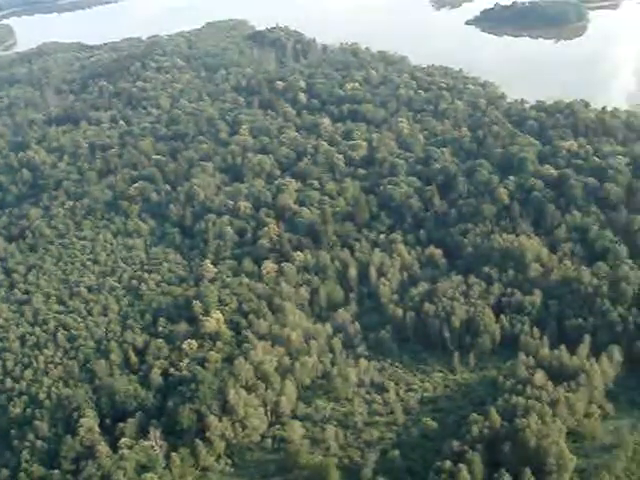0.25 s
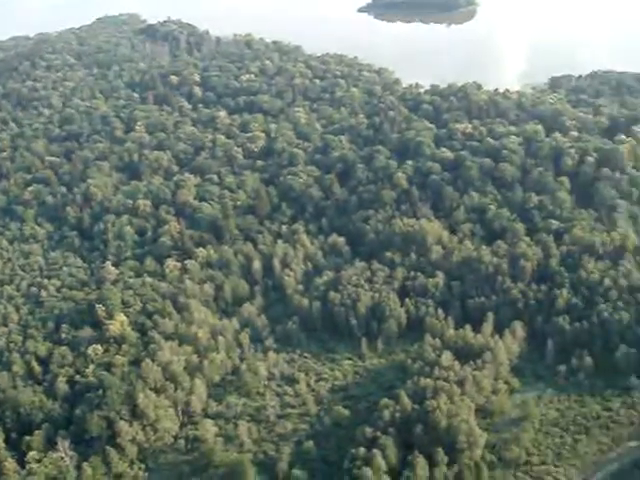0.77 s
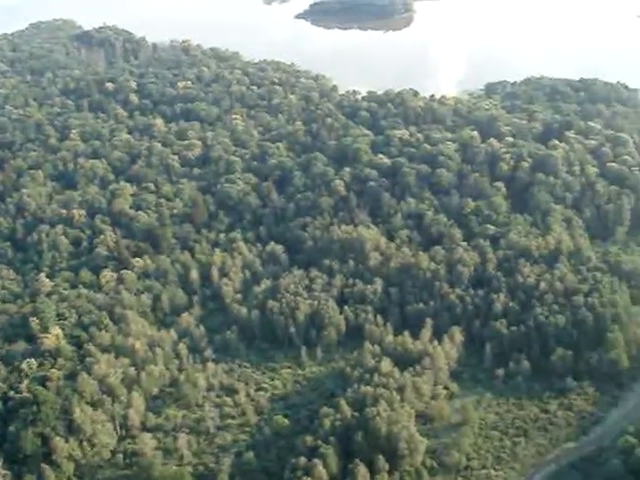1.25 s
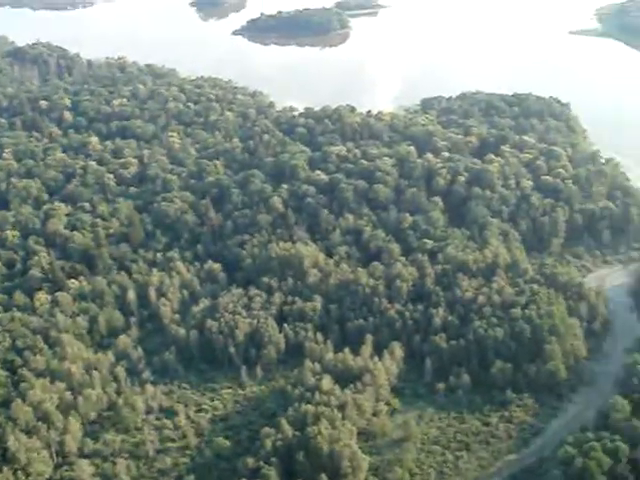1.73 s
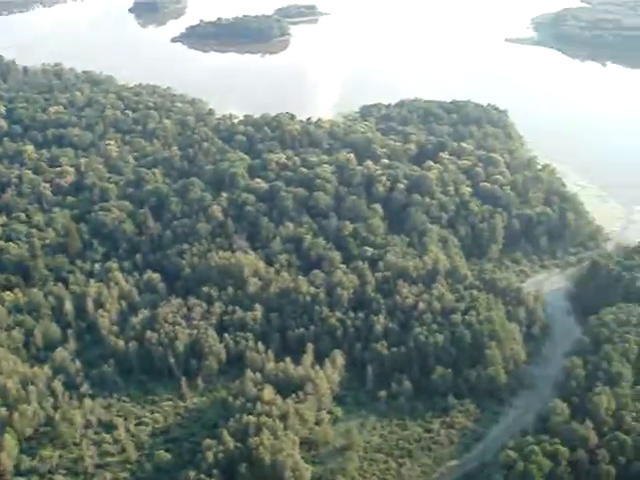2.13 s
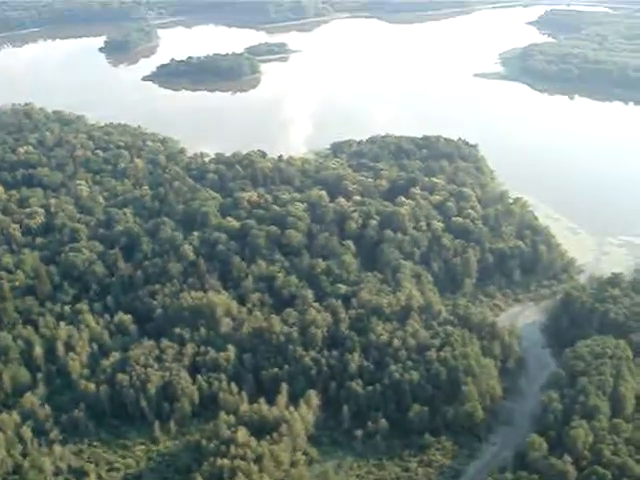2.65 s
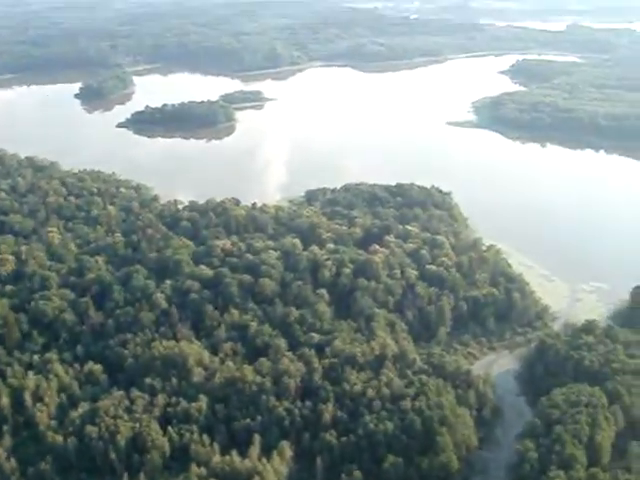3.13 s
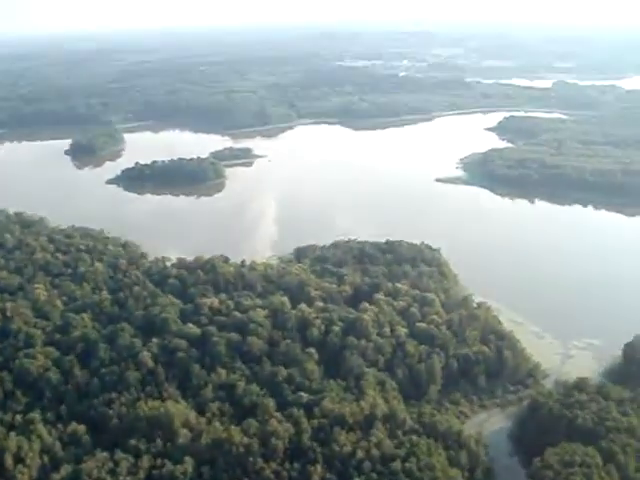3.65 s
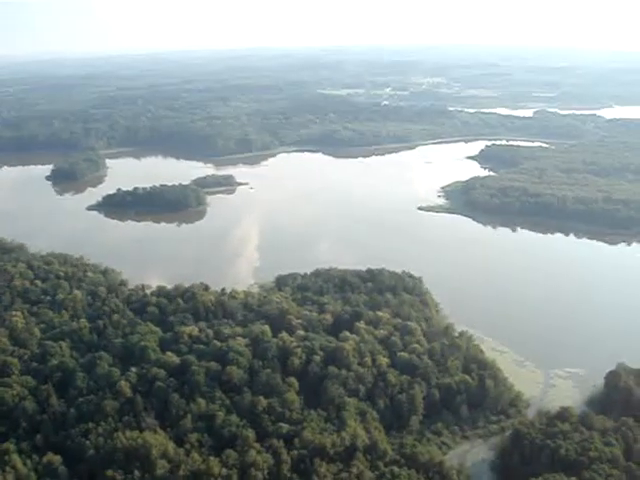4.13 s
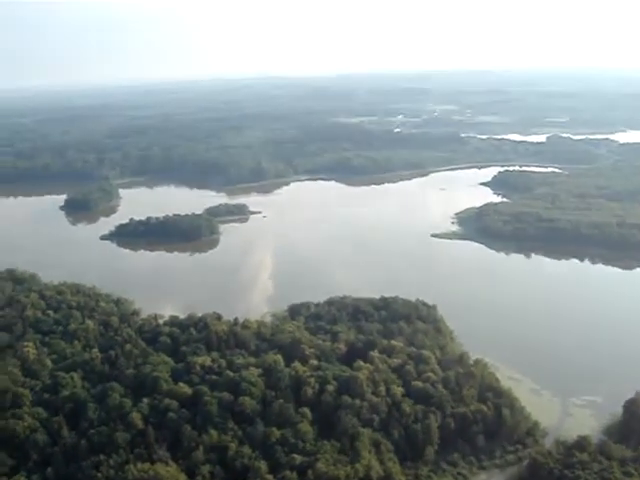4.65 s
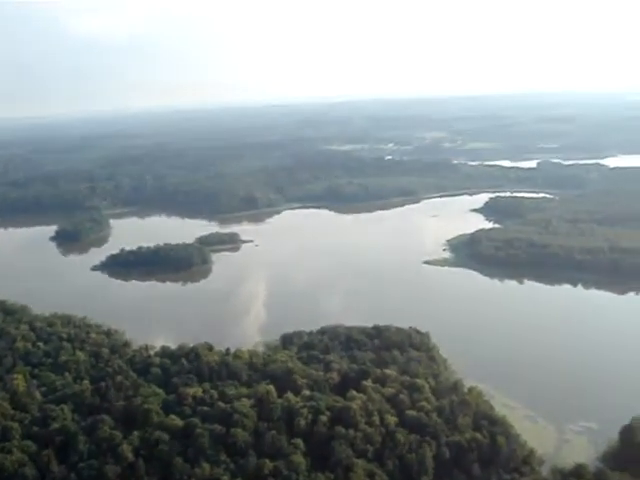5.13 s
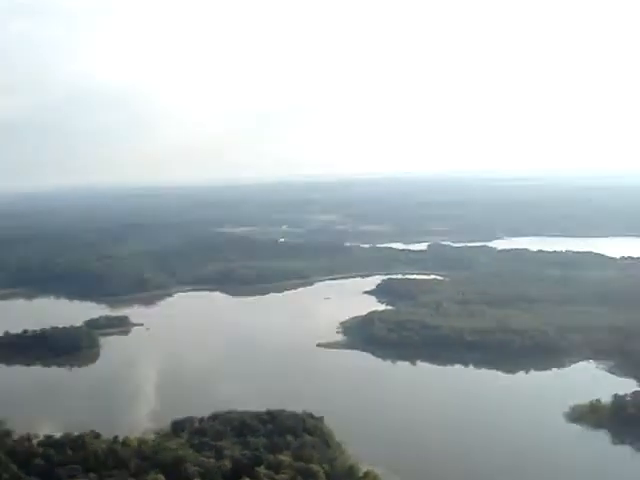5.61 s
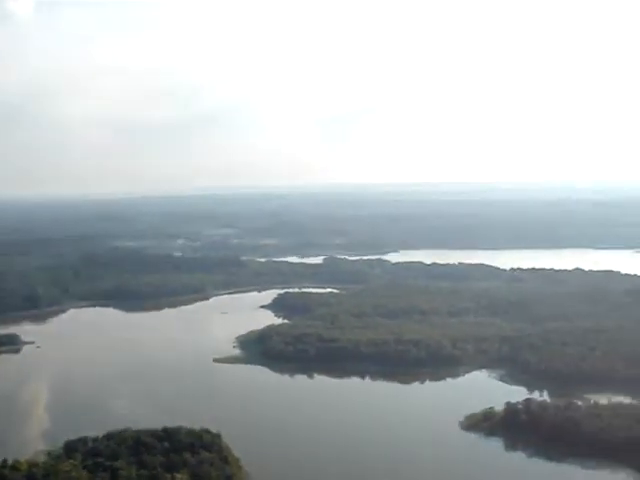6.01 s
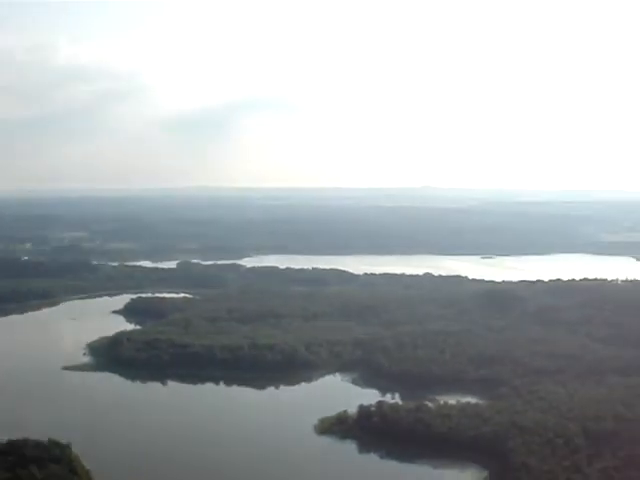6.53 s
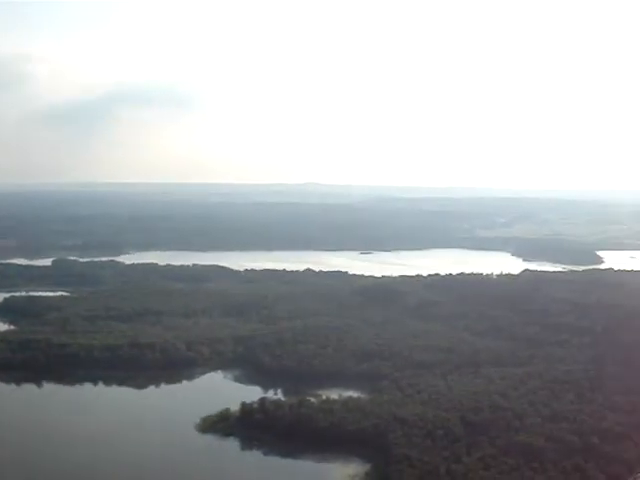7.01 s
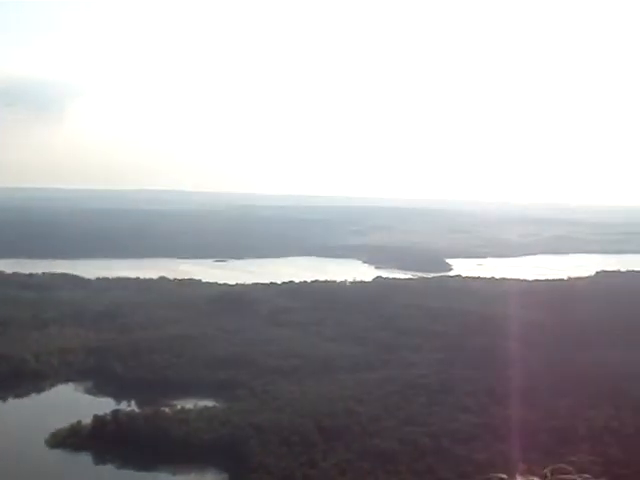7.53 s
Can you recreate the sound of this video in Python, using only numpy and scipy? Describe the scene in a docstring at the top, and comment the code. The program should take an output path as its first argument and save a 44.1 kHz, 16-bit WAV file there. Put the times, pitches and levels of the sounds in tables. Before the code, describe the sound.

Quiet, uneven gas spurts and tiny low flame puffs come first, with a faint metallic ring. Then the propane valve opens: a sharp rush, a deep soft-edged thump, and a massive continuous flame roar. It flares, settles quickly and holds almost even, slowly changing tone as the microphone swings around. Heard very near, centred, dry, outdoors without echo, with no pause before the end.

```python
"""Short hisses of gas spit over a fluttering pilot flame, then a whoomp opens one long, roaring blast.
This is a hot-air balloon's propane burner, heard from the basket in open air.
Flame, jet, whoomp and spurts are shaped noise; pilot puffs and a fading hum of the metal are sines.
The microphone turns slowly, so reflections reshape the roar and the jet's hiss is gradually shaded."""
import sys
import numpy as np
from scipy import signal
from scipy.fft import rfft, irfft, next_fast_len
from scipy.io import wavfile
from scipy.ndimage import uniform_filter1d, map_coordinates

SR = 44100
rng = np.random.default_rng(int(sys.argv[2]) if len(sys.argv) > 2 else 0)


def to_wav(sig):
    """Store sig (one row per channel, or 1-D mono) as 16-bit WAV at the path in sys.argv[1].

    Samples outside -1..1 are clipped; the rate is SR.
    """
    pcm = np.clip(np.atleast_2d(sig), -1, 1) * 32767
    pcm = np.round(pcm).astype(np.int16)
    wavfile.write(sys.argv[1], SR, pcm.T)  # frames by channels


N = 342216

# Noise colours, each rescaled to rms 1 before its layer's level: freq_hz, density_db (relative, per Hz)
ROAR_SPECTRUM = [(15, -44), (28, -35), (60, -20), (105, -15), (148, -5.5), (195, -7.5), (255, -1.5),
                 (315, -4.5), (355, 2), (395, -2.5), (470, 2), (550, 2), (750, -2.5), (950, -13),
                 (1400, -35.5)]
RASP_SPECTRUM = [(600, -22.5), (900, -1.5), (1100, 2.5), (1400, -1.5), (1650, -0.5), (1780, 2.5), (1920, 3),
                 (2090, -1), (2350, -4.5), (2600, -16.5), (3400, -29)]
HISS_SPECTRUM = [(1500, -23.5), (2500, -8.5), (3100, -6.5), (4100, -3), (4750, -4.5), (5200, -1.5),
                 (6250, 0), (6800, -1.5), (7650, -2.5), (8300, -11), (9900, -17.5), (11000, -54.5)]
THUMP_SPECTRUM = [(25, -34), (70, -14), (105, -3.5), (145, 2), (280, -11), (420, -8), (700, -11),
                  (900, -22), (1150, -18.5), (2200, -25.5), (3000, -27), (8000, -53)]
SPIT_SPECTRUM = [(300, -11), (1000, -19), (2000, -14.5), (2800, -11.5), (4100, -2), (4900, -5), (5800, 2),
                 (7700, -1), (8500, -10), (10000, -22.5)]
PILOT_SPECTRUM = [(25, -11.5), (70, -2.5), (145, 5.5), (250, 6), (400, 4.5), (700, 3.5), (900, -11.5),
                  (1100, 2), (1420, -5), (1900, -0.5), (3000, -5.5), (4300, -2), (5500, -13), (9900, -29)]
# Short spurts of gas before the blast: start_s, level_db, hold_s (counted from the start)
SPURTS = [(.006, -30, 0.034), (0.073, -32.5, 0.019), (0.19, -25.5, 0.016), (0.326, -28.5, .016),
          (.363, -32.5, 0.015), (0.44, -42, 0.011), (0.499, -26, 0.017), (0.591, -41, .012),
          (0.648, -32.5, 0.015), (.663, -29.5, 0.012), (.711, -31.5, .009), (.759, -38, .011),
          (0.837, -24, .009)]
# Burner metal stirred by the spurts: freq_hz, level_db (when stirred hardest), width_hz
METAL_RING = [(1060, -54, 90), (1890, -46, 200), (2240, -52.5, 21), (3300, -60, 700), (4300, -44.5, 400),
              (5450, -44.5, 240)]
# Soft low puffs of the small flame: start_s, level_db, pitch_hz
PUFFS = [(.06, -27.5, 170), (0.124, -28, 185), (0.249, -31.5, 440), (.393, -33, 534), (.465, -36, 175),
         (0.6, -32, 163), (0.834, -24.5, 188)]
# Where reflections cancel the direct sound (a negative depth is a slight boost):
# freq_before_hz, freq_after_hz, width (natural log of frequency ratio), depth_before_db, depth_after_db
NOTCHES = [(440, 400, 0.063, 4, 0), (864, 593, 0.12, 7, 6.5), (1670, 956, 0.25, 3.5, 3),
           (2190, 2144, 0.056, -0.5, 4.5), (2570, 3480, 0.091, 3, 1.5)]
# Change of colour when fully shaded: freq_hz, gain_db
SHADE_COLOUR = [(150, 0), (290, -1.5), (440, .5), (540, -0.5), (760, 4), (950, 1.5), (2200, -1.5),
                (2750, 1.5), (4300, -2), (5700, -4.5), (7000, -3), (10000, -4)]

# The main flame flares up as it lights, then burns evenly
LIGHT_S, LIGHT_RISE_S, FLARE_SETTLE_S = 0.92, 0.068, 0.17
ROAR_DB, ROAR_FLARE_DB = -16, 3.5
RASP_DB, RASP_FLARE_DB = -23.8, 5
# The flame gains a little as the microphone comes to face it
FACING_START_S, FACING_LENGTH_S, FACING_ROAR_DB, FACING_RASP_DB = 3.7, 2.3, 0.5, 2.8
# The gas jet opens with a surge, then settles to a steady flow
VALVE_OPEN_S, JET_RISE_S, JET_RISE_DB = 0.904, 0.054, 29
JET_DB, SURGE_DB, SURGE_HOLD_S, SURGE_SETTLE_S = -23.5, 7.5, 0.053, 0.042
WHISTLE_S, WHISTLE_SPREAD_S, WHISTLE_DB = 3.75, 0.73, -32.5
# The cloud of gas catches fire
IGNITION_S, WHOOMP_RISE_S, WHOOMP_HOLD_S, WHOOMP_T60_S, WHOOMP_DB = 0.914, 0.019, 0.017, 0.11, -8.5
SPURT_RISE_S, SPURT_T60_S, RING_T60_S = 0.0053, 0.13, 0.57
# The microphone swings round, then the jet falls into shade
SWING_START_S, SWING_LENGTH_S = 1.95, 4.1
SHADE_START_S, SHADE_LENGTH_S = 4.78, 2.6
TOP_HZ = 10080
FRAME = 2048  # samples per spectral frame, half overlapped


def flame():
    """Large eddies roar; small ones rasp, in quick flickers as pockets of gas burn."""
    t = clock()
    flare = settling(t, LIGHT_S + LIGHT_RISE_S, FLARE_SETTLE_S)
    facing = eased(t, FACING_START_S, FACING_LENGTH_S)
    roar_db = ROAR_DB + ROAR_FLARE_DB * flare + FACING_ROAR_DB * facing
    rasp_db = RASP_DB + RASP_FLARE_DB * flare + FACING_RASP_DB * facing
    flicker = wobble(160)  # shared, so roar and rasp flicker together
    roar = amp(roar_db + 0.5 * flicker + 0.26 * wobble(8.1)) * rush(ROAR_SPECTRUM)
    rasp = amp(rasp_db + 0.51 * flicker + 0.52 * wobble(12)) * rush(RASP_SPECTRUM)
    return ramp(t, LIGHT_S, LIGHT_RISE_S) * (roar + rasp)


def jet():
    """Gas surges from the nozzles, settles to an even hiss and whistles faintly for a moment."""
    t = clock()
    opening = ramp(t, VALVE_OPEN_S, JET_RISE_S)
    surge = settling(t, VALVE_OPEN_S + JET_RISE_S + SURGE_HOLD_S, SURGE_SETTLE_S)
    level_db = JET_DB + SURGE_DB * surge - JET_RISE_DB * (1 - opening)
    hiss = amp(level_db + 0.8 * wobble(220) + 0.49 * wobble(15)) * rush(HISS_SPECTRUM)
    swell = np.exp(-((t - WHISTLE_S) / WHISTLE_SPREAD_S) ** 2)
    whistle = amp(WHISTLE_DB) * swell * singing(6190, width_hz=260)
    return (hiss + whistle) * (t > VALVE_OPEN_S)


def ignition():
    """The gathered gas burns all at once in a low whoomp."""
    t = clock()
    age = np.maximum(t - IGNITION_S - WHOOMP_RISE_S - WHOOMP_HOLD_S, 0)
    decay = amp(WHOOMP_DB - 60 * age / WHOOMP_T60_S)
    return eased(t, IGNITION_S, WHOOMP_RISE_S) * decay * rush(THUMP_SPECTRUM)


def spurt_power(t60_s):
    """Summed power of all the spurts, each dying away over t60_s."""
    t = clock()
    return sum((amp(level_db) * burst(t, start_s, SPURT_RISE_S, hold_s, t60_s)) ** 2
               for start_s, level_db, hold_s in SPURTS)


def spurts():
    """Each spurt of gas opens fast, holds briefly and bleeds away; the metal rings on."""
    sputter = amp(1.9 * wobble(500) + 0.6 * wobble(90))
    spit = rippled(rush(SPIT_SPECTRUM), patchy_db=4.0, frames=6)
    hiss = np.sqrt(spurt_power(SPURT_T60_S)) * sputter * spit
    ring_power = spurt_power(RING_T60_S)
    ring = sum(amp(level_db) * singing(freq_hz, width_hz) for freq_hz, level_db, width_hz in METAL_RING)
    return hiss + np.sqrt(ring_power / ring_power.max()) * ring


def pilot():
    """The small flame flutters as soft noise and puffs in short, low sine swells."""
    t = clock()
    out = amp(-42.0 + 1.5 * wobble(15)) * rush(PILOT_SPECTRUM)
    for start_s, level_db, pitch_hz in PUFFS:
        age = np.maximum(t - start_s, 0)
        swell = age / 0.0023  # the puff peaks 2.3 ms after it starts
        out += amp(level_db) * swell * np.exp(1 - swell) * np.sin(2 * np.pi * pitch_hz * age)
    return out


def metal_hum(freq_hz, level_db, t60_s):
    """One clear mode of the metal hums faintly, wavers and dies away from the start."""
    t = clock()
    level = amp(level_db - 60 * t / t60_s + 2 * wobble(14))
    return level * np.sin(2 * np.pi * freq_hz * t + 0.25 * wobble(27))


def turning(x):
    """As the microphone turns, the notches of near reflections slide and the treble falls into shade."""
    hz, t, frames = signal.stft(x, SR, nperseg=FRAME)
    swing = eased(t, SWING_START_S, SWING_LENGTH_S)
    shade = eased(t, SHADE_START_S, SHADE_LENGTH_S)
    gain_db = np.outer(curve_db(SHADE_COLOUR, hz), shade)
    for before_hz, after_hz, width, before_db, after_db in NOTCHES:
        centre_hz = before_hz * (after_hz / before_hz) ** swing
        depth_db = before_db + (after_db - before_db) * swing
        distance = np.log((hz[:, None] + 1) / centre_hz) / width
        gain_db -= depth_db * np.exp(-distance ** 2)
    return signal.istft(frames * amp(gain_db), SR, nperseg=FRAME)[1][:N]


def rippled(x, patchy_db, frames):
    """Random ripples of colour, growing up to 3 kHz, each lasting about the given count of frames."""
    hz, _, z = signal.stft(x, SR, nperseg=FRAME)
    ripple = uniform_filter1d(rng.standard_normal(z.shape), size=9, axis=0)  # smooth over frequency
    ripple = uniform_filter1d(ripple, size=frames, axis=1)  # smooth over time
    gain_db = patchy_db * unit(ripple) * np.clip(hz / 3000, 0, 1)[:, None]
    return signal.istft(z * amp(gain_db), SR, nperseg=FRAME)[1][:N]


def rush(spectrum):
    """Turbulent noise of rms 1 with the given spectrum."""
    return unit(filtered(rng.standard_normal(N), lambda hz: amp(curve_db(spectrum, hz))))


def singing(centre_hz, width_hz):
    """Noise through a narrow resonance, as when flow makes a part sing, rms 1."""
    return unit(filtered(rng.standard_normal(N), lambda hz: 1 / (1 + (2 * (hz - centre_hz) / width_hz) ** 2)))


def curve_db(table, hz):
    """Reads a frequency and dB table between its points, on a log frequency scale."""
    freq_hz, db = np.transpose(table)
    return np.interp(np.log(hz + 1), np.log(freq_hz), db)


def filtered(x, response):
    """Filters x by a gain that depends on frequency."""
    m = next_fast_len(N + 8192)  # padding for the filter's tail
    return irfft(rfft(x, m) * response(np.fft.rfftfreq(m, 1 / SR)), m)[:N]


def wobble(rate):
    """A smooth random curve through rate random points a second."""
    points = rng.standard_normal(int(N * rate / SR) + 4)
    return map_coordinates(points, [clock() * rate])


def burst(t, start, rise, hold, t60):
    """Gain that rises, holds until hold seconds after the start, and dies away."""
    return ramp(t, start, rise) * amp(-60 * np.maximum(t - start - hold, 0) / t60)


def settling(t, start, settle):
    """Stays at 1 until start, then relaxes towards 0."""
    return np.exp(-np.maximum(t - start, 0) / settle)


def eased(t, start, length):
    """Rises from 0 to 1 with a soft start and stop."""
    return 0.5 - 0.5 * np.cos(np.pi * ramp(t, start, length))


def ramp(t, start, length):
    """Rises evenly from 0 to 1."""
    return np.clip((t - start) / length, 0, 1)


def clock():
    """Time of every sample in seconds."""
    return np.arange(N) / SR


def amp(db):
    """Decibels to gain."""
    return 10 ** (np.asarray(db) / 20)


def unit(x):
    """Scale to rms 1."""
    return x / np.sqrt(np.mean(x ** 2) + 1e-20)


def scene():
    """The burner is one close source, alike in both channels; only the blast is reshaped by the turn."""
    blast = turning(rippled(flame() + jet(), patchy_db=1.96, frames=40))
    hum = metal_hum(freq_hz=1243, level_db=-47.5, t60_s=8)
    burner = blast + ignition() + spurts() + pilot() + hum
    return np.array([burner, burner])


def record(dry):
    """Rounds off the highest peaks, then removes the treble above a steep band limit."""
    ceiling = 0.69
    rounded = dry / (1 + np.abs(dry / ceiling) ** 8) ** (1 / 8)

    def band_limit(hz):
        """Falls from 1 to 0 over 120 Hz, centred on TOP_HZ."""
        return np.clip((TOP_HZ - hz) / 120 + 0.5, 0, 1)

    return np.array([filtered(side, band_limit) for side in rounded])


dry = scene()
out = record(dry)
to_wav(out)
```